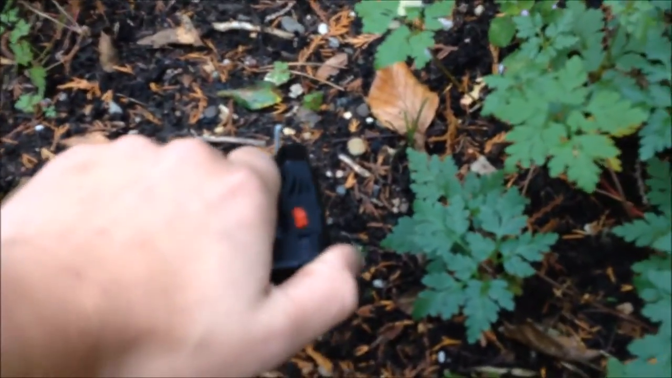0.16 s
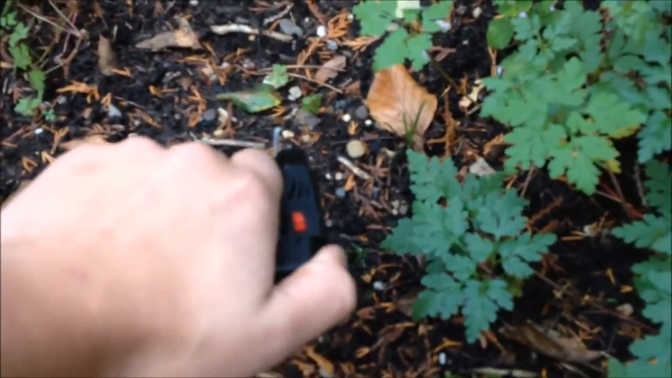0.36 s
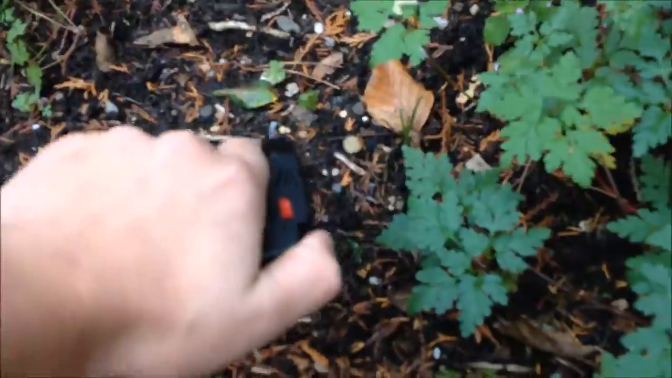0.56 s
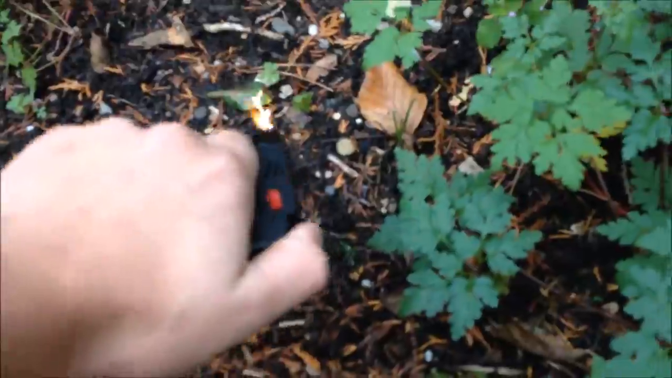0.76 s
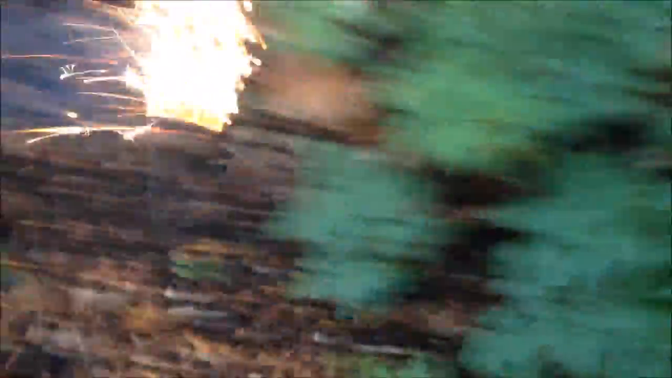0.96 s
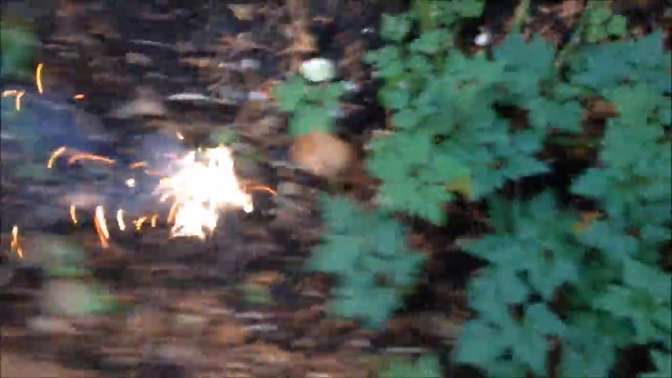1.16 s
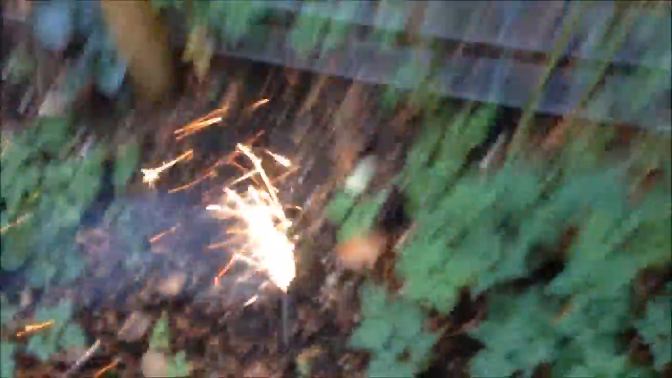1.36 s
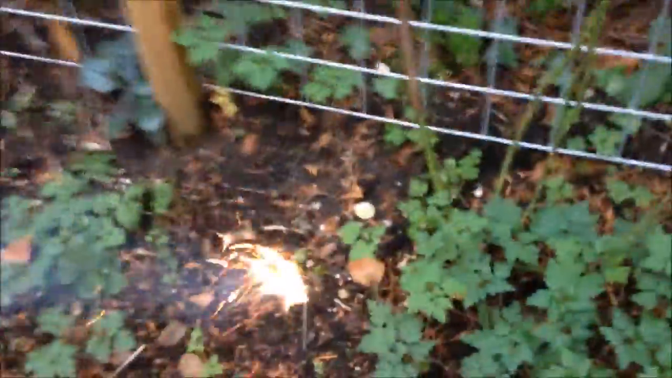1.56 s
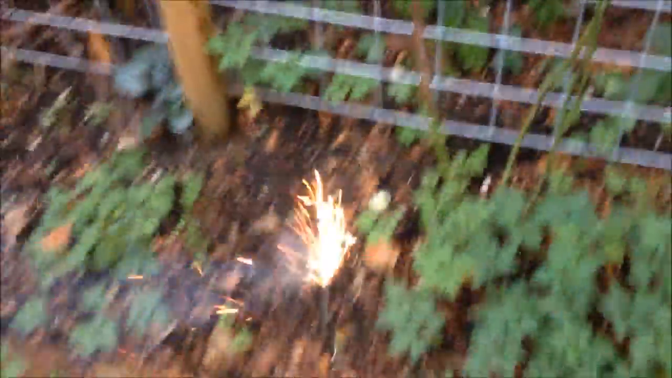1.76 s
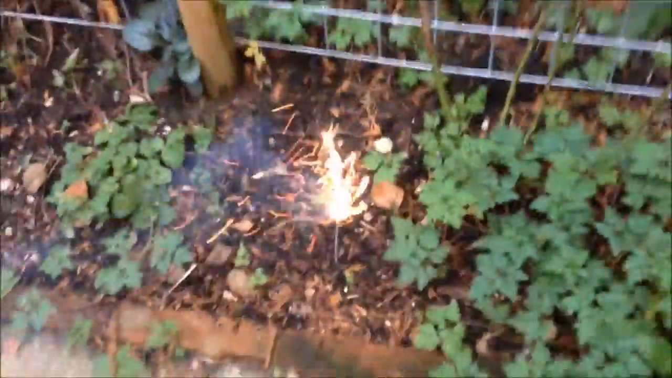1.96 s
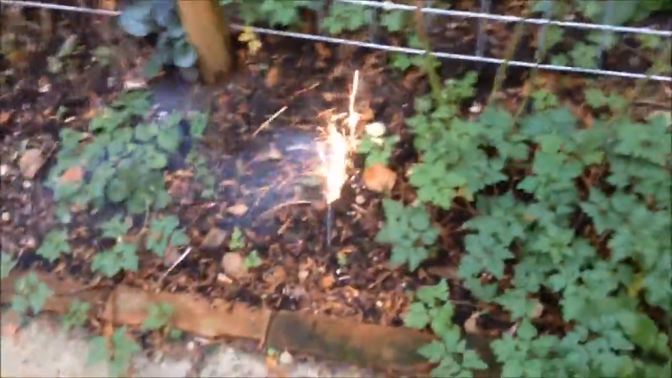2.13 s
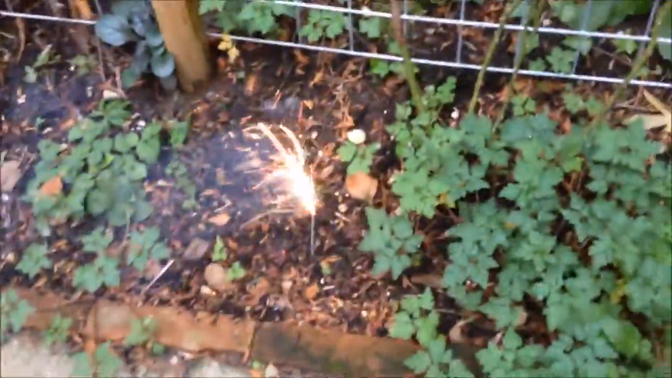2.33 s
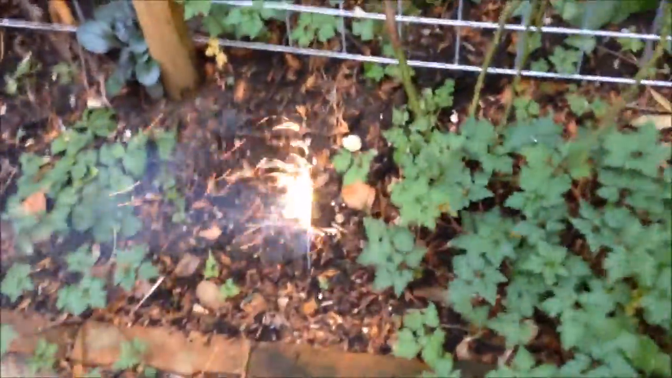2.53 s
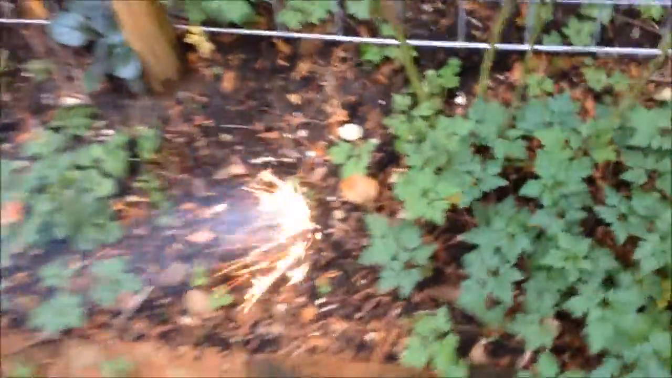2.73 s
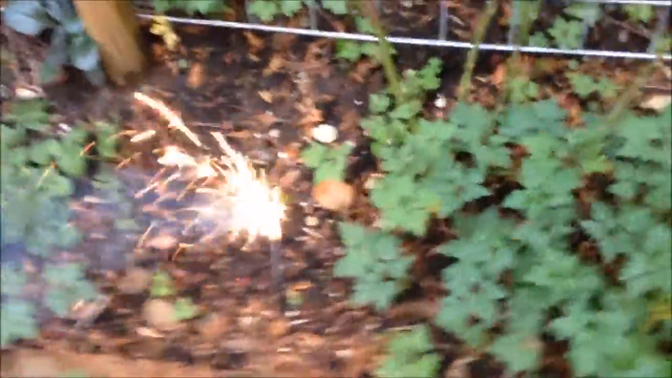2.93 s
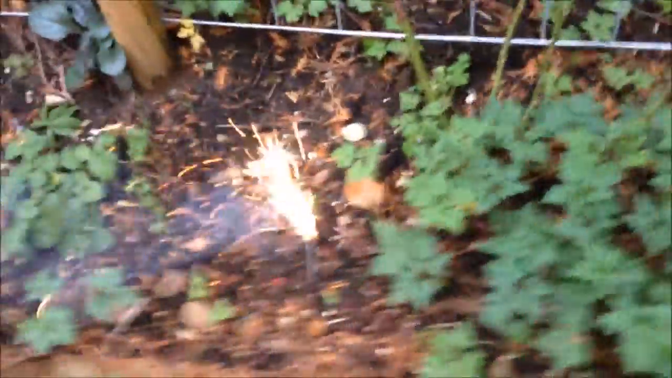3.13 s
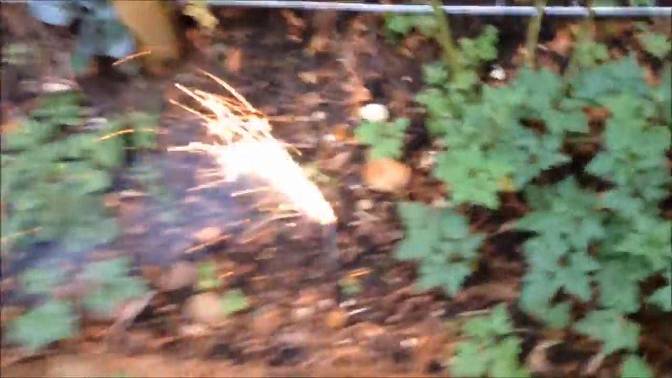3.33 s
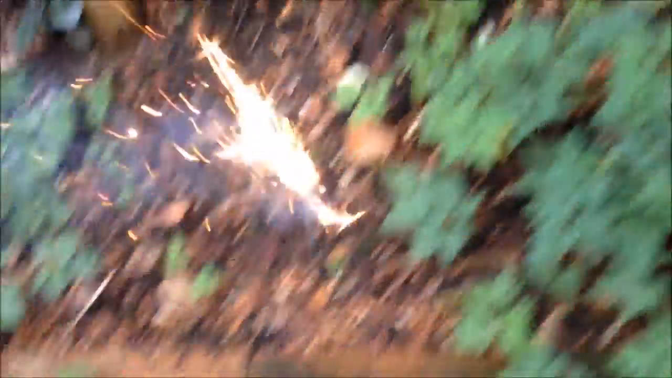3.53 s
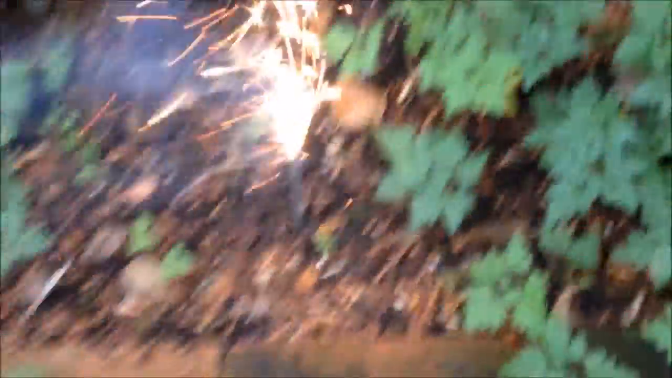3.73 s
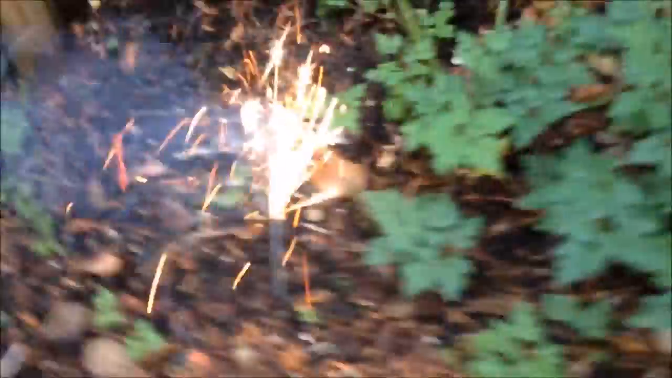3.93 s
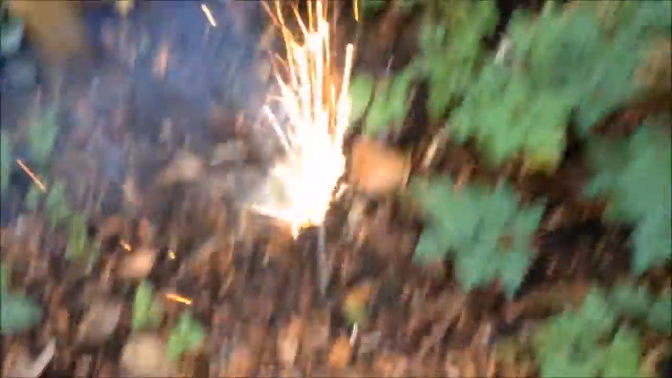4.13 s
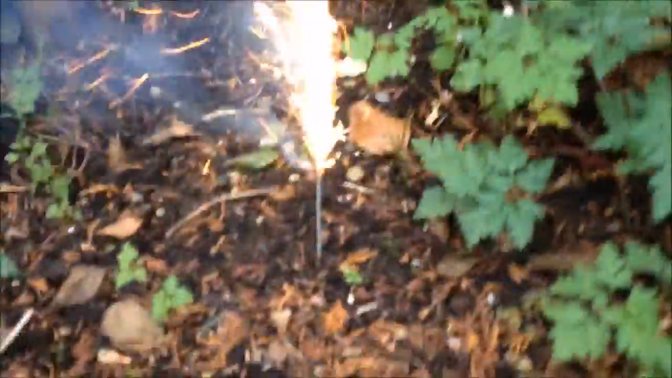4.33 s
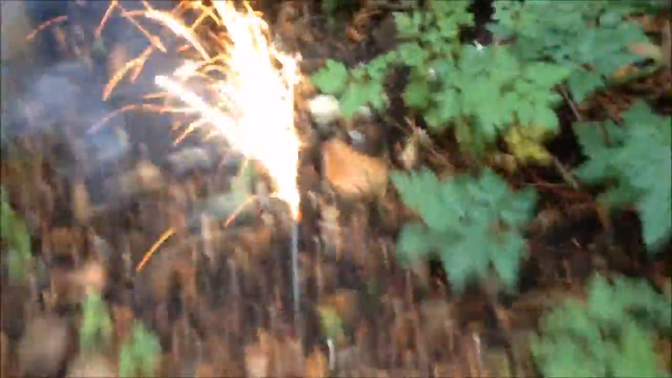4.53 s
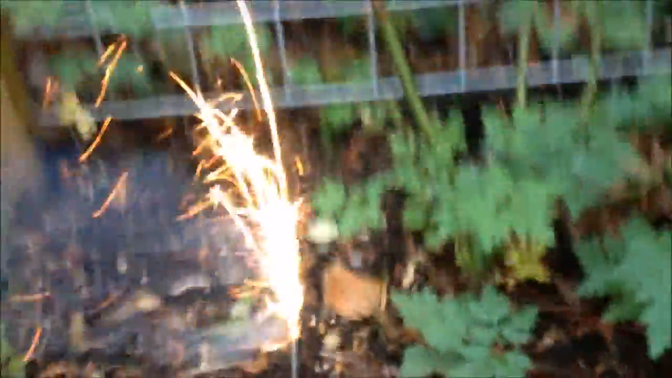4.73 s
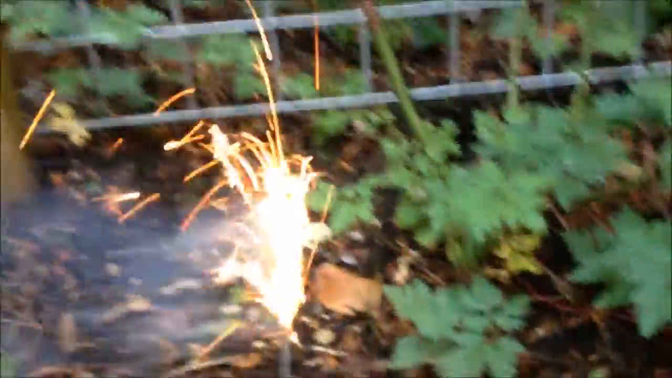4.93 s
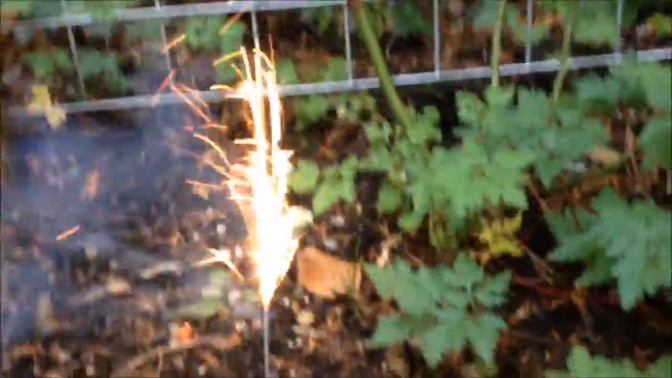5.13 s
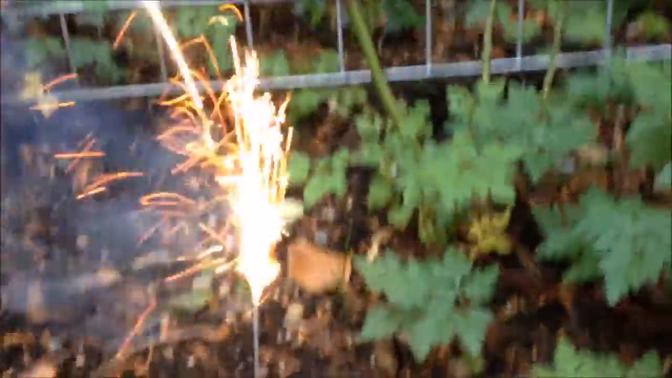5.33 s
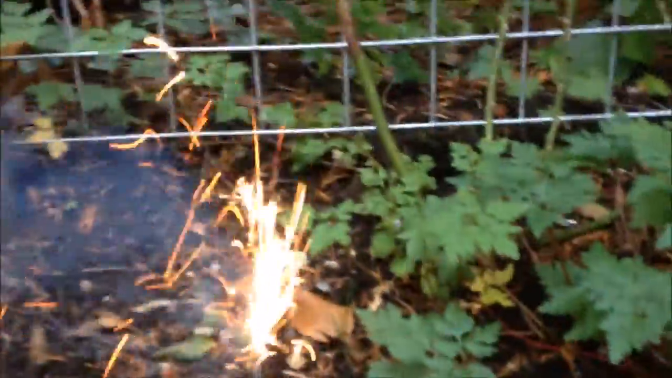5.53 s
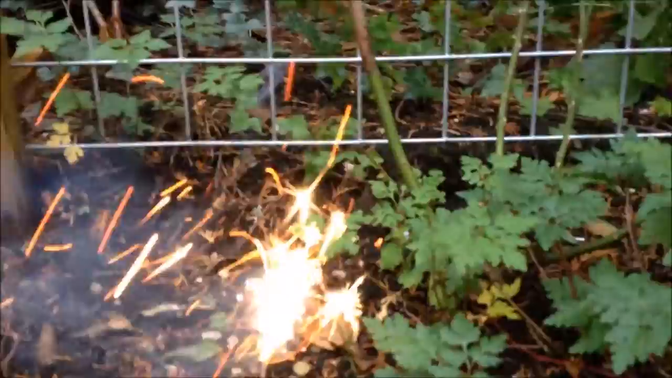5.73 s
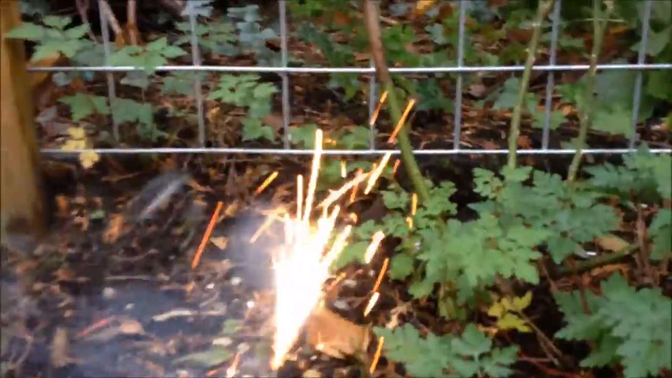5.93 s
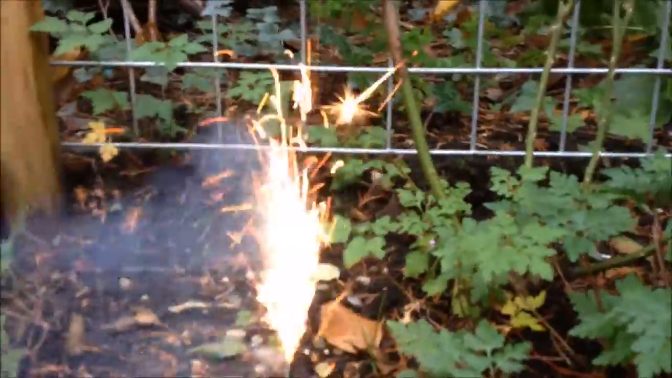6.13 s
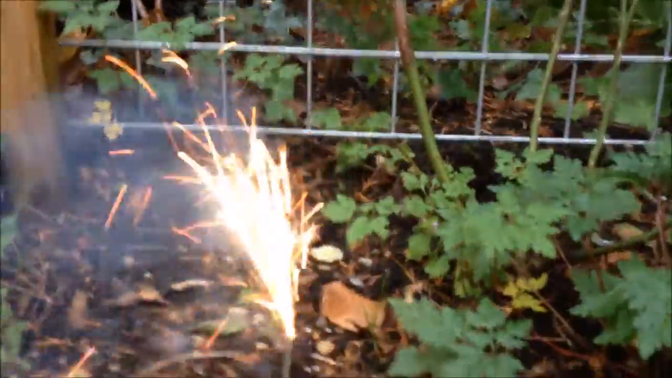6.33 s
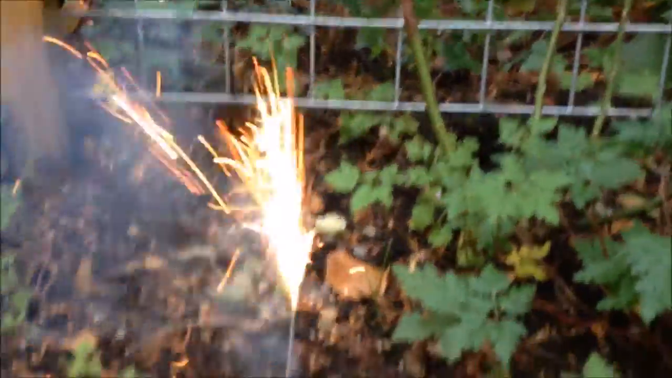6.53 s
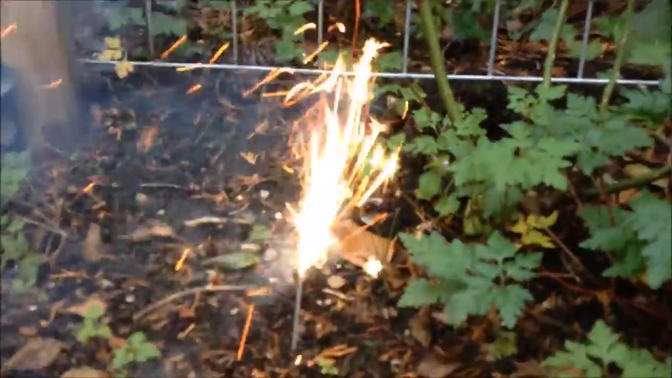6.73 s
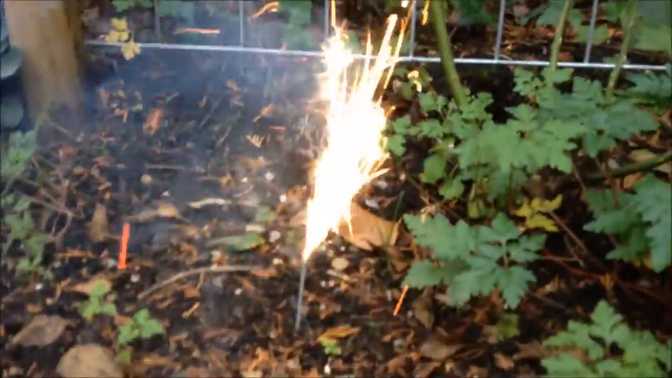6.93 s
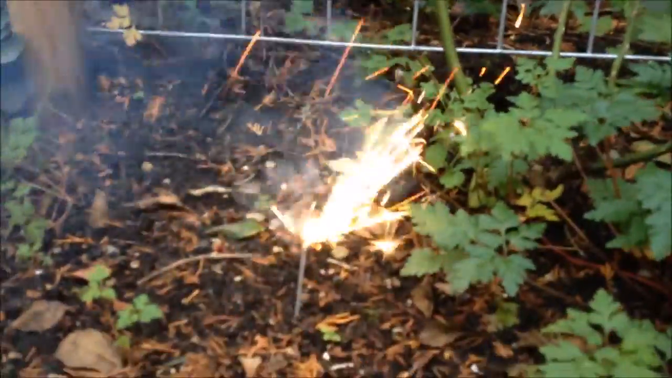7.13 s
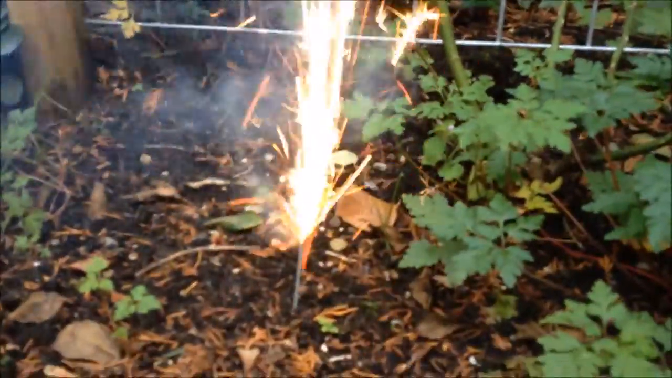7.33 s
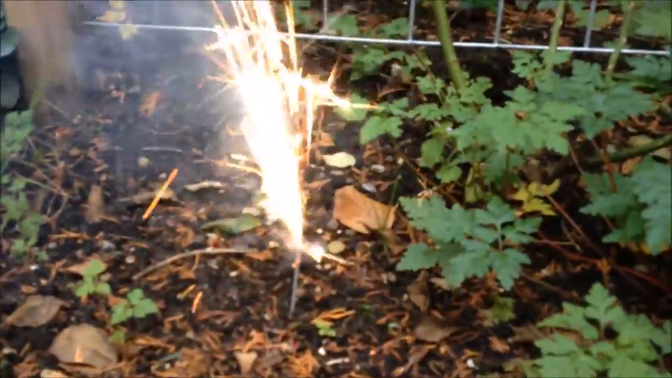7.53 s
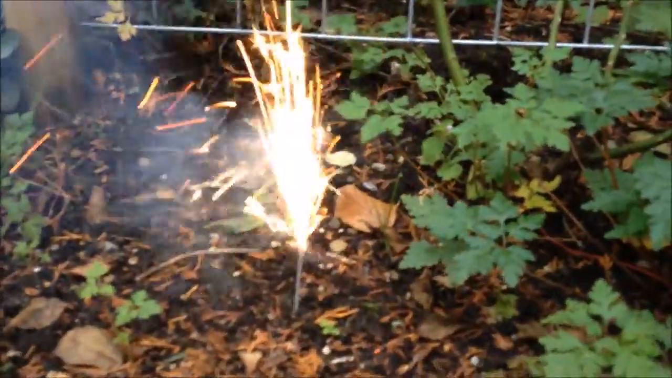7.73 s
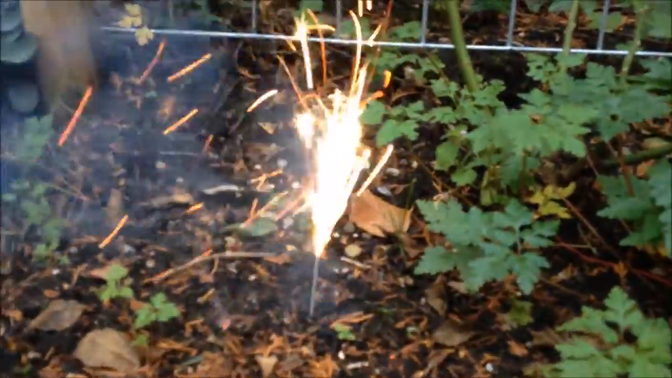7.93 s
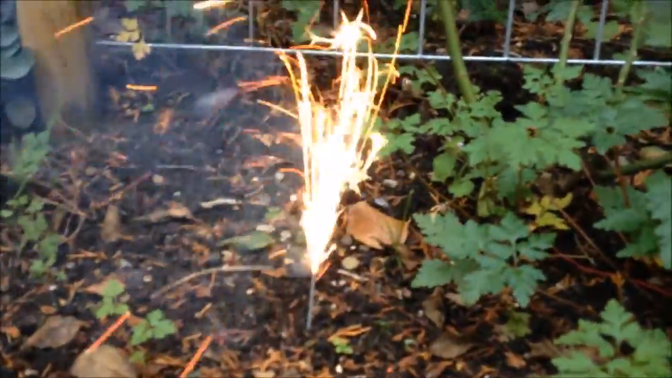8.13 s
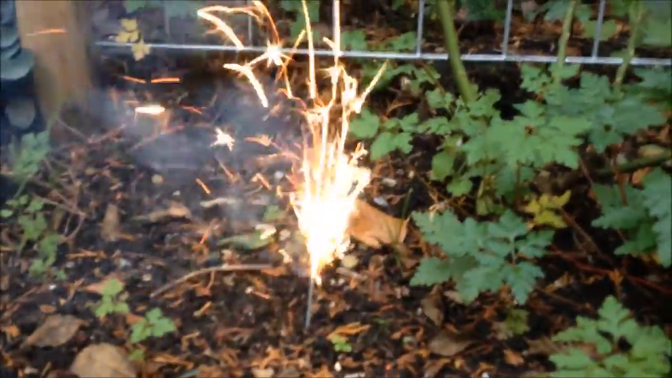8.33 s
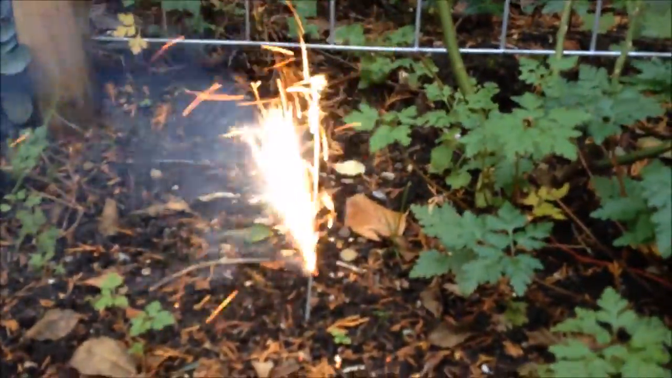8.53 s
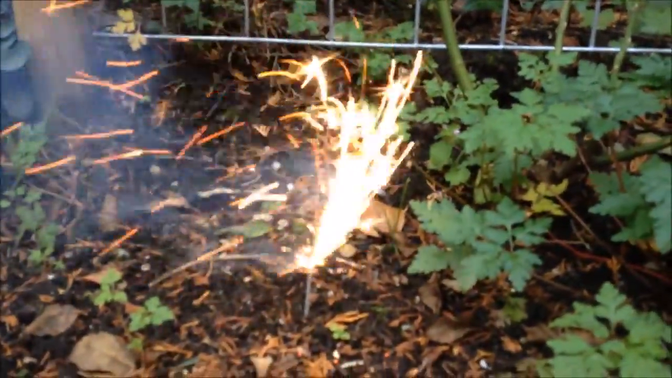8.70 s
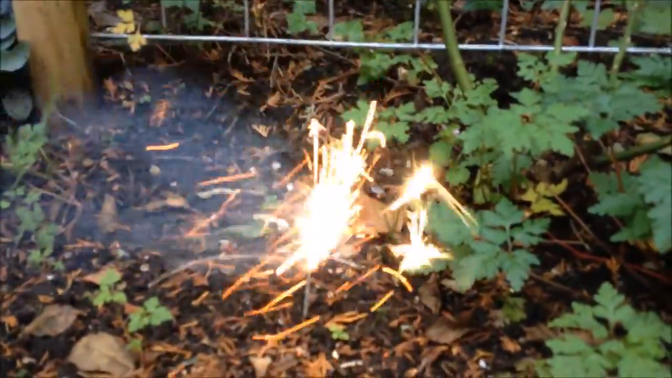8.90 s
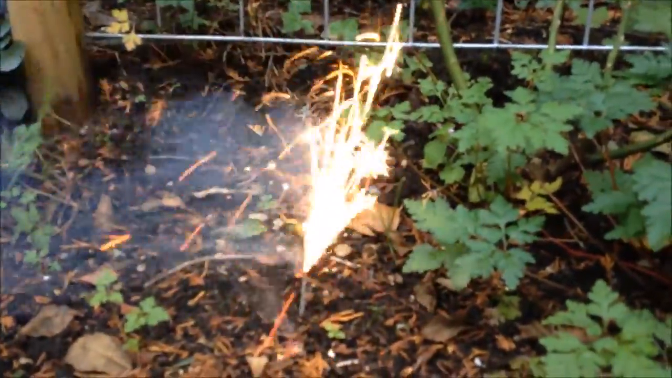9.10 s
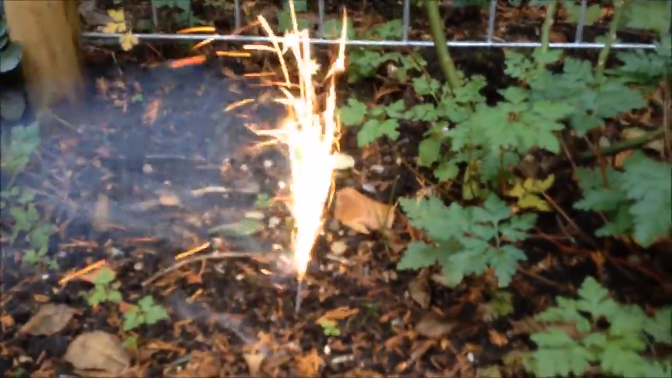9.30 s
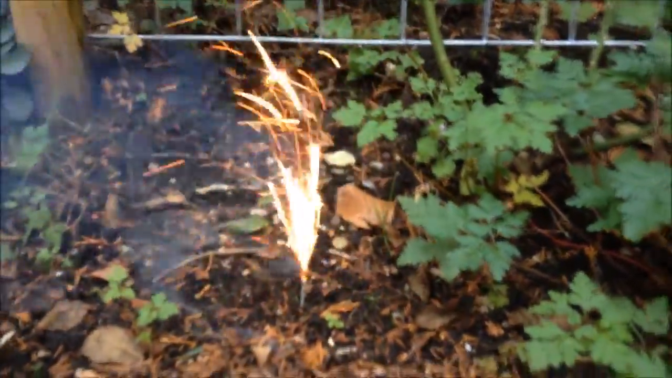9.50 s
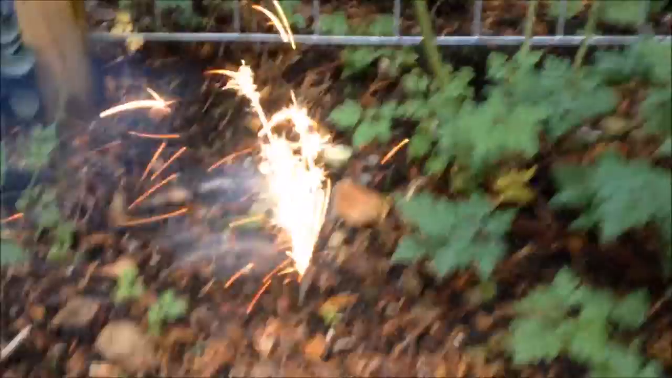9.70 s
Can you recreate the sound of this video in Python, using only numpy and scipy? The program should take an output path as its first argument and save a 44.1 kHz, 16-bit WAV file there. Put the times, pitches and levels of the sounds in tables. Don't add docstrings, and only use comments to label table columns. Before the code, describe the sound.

A quiet garden, with low distant road rumble and a faint nearby machine hum at first. At 0.13 s a plastic lighter ticks lightly, then at 0.28 s its trigger snaps loudly, a brief bright rattle with a short outdoor tail. Soft foot shuffles and a barely audible gas flutter follow. From about 0.8 s a sparkler catches with tiny crackles, rushing up to a strong bright hiss by 1.0 s as the trigger clicks back faintly. Dull, gritty steps retreat from 1.05 to 1.75 s, with softer thumps near 3, 3.8 and 7.4 s. The hiss eases around 2.7 s, then strengthens again, sputtering and flickering with sharp snaps and pops until the end at 9.8 s. Its hollow phasing colour gradually climbs. A faint car swells near 5.75 s and fades. Mono small-camera sound, with occasional momentary watery whistles.

```python
import sys
import numpy as np
from scipy import signal
from scipy.fft import rfft, irfft
from scipy.io import wavfile
from scipy.ndimage import uniform_filter1d, map_coordinates

SR = 44100
rng = np.random.default_rng(int(sys.argv[2]) if len(sys.argv) > 2 else 0)


def rack_gain(trim_db):
    fader = np.asarray(trim_db, float)
    return 10 ** (fader / 20)


def bounce(signal):
    frames = np.transpose(np.atleast_2d(signal))
    limited = np.clip(frames, -1, 1)
    pcm = np.round(limited * 32767).astype(np.int16)
    wavfile.write(sys.argv[1], SR, pcm)


N = 430416
TIME = np.arange(N) / SR
SHORT = TIME[:8192]

# t/s, level/dB
ROAD_LEVEL = [(0, -64), (.42, -59.5), (.62, -64.5), (1.1, -59.5), (2.5, -65.5), (3.3, -67), (3.9, -59.5),
              (4.5, -69), (7.5, -60), (8.2, -61.5), (9.76, -58.5)]
# f/Hz, level/dB
ROAD_TONE = [(12, -71), (20, -42), (32, -37), (54, -21), (136, 4.5), (236, 3.5), (300, -14.5), (390, -39),
             (660, -120)]
# f/Hz, level/dB
GARDEN_TONE = [(150, -15.5), (250, -7.5), (400, -8), (1000, -13.5), (1800, -19), (2500, -23.5), (3750, -22),
               (14600, -35.5), (15400, -28)]
GARDEN_DB = -61
# f/Hz, width/Hz, level/dB, lead/s
EXHAUST = [
    (139, 26, -53, -0.36),
    (238, 26, -56, 0.17),
]
CAR_DB, CAR_PASS_S, CAR_NEAR_S, CAR_FALL = -49, 5.75, 0.38, 1.4
WHINE_DB, WHINE_LEAD_S = -50.5, 0.23
HUM_DB, ROAR_DB = -69.5, -12.5
FAN_HZ, FAN_WIDTH_HZ, FAN_DB, FAN_HIDDEN_S = 173.4, 33, -62, 1.3

# t/s, peak level/dB, tail minus peak/dB, body thud minus peak/dB
LIGHTER_CLICKS = [
    (0.1335, -28.5, -18.5, -18.5),
    (0.279, -11.5, -19, -29),
    (1.0187, -31, -20, -24),
]
# f/Hz, level/dB, time to fall 60 dB/s
CATCH_RINGS = [(1560, -6, .008), (2200, -17, .005), (3140, -10, .005), (3730, -8, .006), (4550, -9, .005),
               (5300, -16, 0.0037), (6780, 0.5, .004), (7600, -1, .003), (8410, 0, .004), (10670, -8, .004),
               (12480, -15, .004), (14000, -19, .004)]
# f/Hz, level/dB, time to fall 60 dB/s
TRIGGER_RINGS = [(1880, -14, .01), (3400, -13, 0.0056), (3900, -19, .005), (4310, -15, .005),
                 (5000, -19, 0.008), (6350, -17, .004), (7140, -1, 0.0037), (8000, -12, .004),
                 (8450, -9, .005), (9440, -11, 0.0044), (11000, -16, .004), (11950, -13, 0.004),
                 (13050, -9, .004), (13840, -13, .004)]
# f/Hz, level/dB, time to fall 60 dB/s
RELEASE_RINGS = [(1750, -8, .01), (2900, -6, 0.0045), (3500, -4, .004), (4230, -8, .004), (5160, -4, .003),
                 (6810, -1, 0.0036), (8070, -9, .003)]
# f/Hz, level/dB
CLICK_TAIL_TONE = [(700, -28), (1800, -3.5), (2600, -8), (4500, -3), (7500, -4.5), (10500, -12),
                   (15400, -16)]
# f/Hz, level/dB
GAS_TONE = [(800, -9.5), (1300, -4), (1800, 2.5), (2100, -9.5), (2500, -18.5)]
GAS_DB = -64.5

# t/s, peak level/dB, f/Hz, time to fall 60 dB/s, grit share
FOOTSTEPS = [(0.197, -54, 194, 0.096, 0.57), (0.281, -43, 378, 0.035, .3), (0.439, -50, 167, 0.064, 0.41),
             (1.062, -55, 80, .12, 0.077), (1.066, -38, 184, 0.079, 0.23), (1.215, -41, 260, 0.045, 0.87),
             (1.24, -51, 75, .1, 0), (1.31, -34, 300, 0.04, 0.46), (1.318, -31.5, 310, 0.046, 0.41),
             (1.334, -43, 1410, 0.045, 0.98), (1.415, -54, 85, .1, 0.081), (1.747, -32, 248, 0.045, 0.14),
             (1.751, -34, 364, 0.05, .1), (2.965, -44, 450, .03, 0), (3.045, -52, 80, 0.092, 0),
             (3.049, -42.5, 190, 0.068, 0), (3.769, -40, 234, 0.058, .1), (7.408, -42, 369, 0.083, 0.4)]
MIC_LOW_HZ = 95

# t/s, hiss level/dB
FLAME_LEVEL = [(0.76, -75), (0.83, -64), (0.86, -51.5), (0.91, -52.5), (0.94, -45), (1.0, -41),
               (1.4, -44.5), (2.0, -46.5), (2.7, -51.5), (3.3, -45.5), (4.2, -44), (4.7, -41.5), (5.4, -44),
               (6.2, -42.5), (7.5, -46.0), (9.0, -44.5), (9.76, -46)]
# t/s, rise/dB
FLARE_UPS = [(1.26, 1), (1.32, 3.5), (2.04, 2), (2.44, 6.5), (2.78, 4), (2.88, 2.5), (2.96, 6.5),
             (3.64, 1.5), (3.82, 1.5), (4.24, 1), (4.49, 2.5), (4.66, 0.5), (4.96, 0), (5.38, 2.5),
             (6.88, 3.5), (7.02, 1.5), (7.24, 1), (7.32, 4), (7.52, 5.5), (7.76, 4.5), (7.88, 3),
             (7.98, 1.5), (8.1, 3), (8.18, 2.5), (8.3, 1.5), (8.7, 3.5), (9.04, 2.5), (9.22, 2),
             (9.54, 2.5)]
# t/s, dip/dB
JET_LULLS = [(1.08, 2.5), (1.16, 5.5), (1.24, 5.5), (1.58, 4), (1.78, 5.5), (1.92, 2), (3.24, 1.5),
             (3.6, 3.5), (4.16, 4), (4.379, 3), (4.92, 3.5), (5.8, 0), (6.12, 1), (6.26, 2.5), (6.34, 2.0),
             (6.54, 3), (6.8, 4.5), (8.44, 2), (9.43, 1.5), (9.65, 3.5)]
FLARE_RISE_S, FLARE_FADE_S, LULL_S = 0.039, 0.054, 0.03
# f/Hz, level/dB
HISS_TONE = [(150, -14.5), (300, -4.5), (1000, -1.76), (1800, -0.8), (2600, -2.5), (3100, -1), (3500, -3),
             (4200, -1), (6000, -1.5), (7200, -2.06), (8500, -2.5), (10500, -6), (13000, -4), (15400, -6)]
TREBLE_STEADY = 0.12
# t/s, peak level/dB, f/Hz
SPARK_POPS = [(0.209, -56, 6000), (0.2175, -52, 2200), (0.228, -54, 11000), (0.248, -55, 3990),
              (0.4375, -47, 1410), (0.463, -48, 1730), (0.5872, -48, 1600), (0.635, -43, 1780),
              (0.641, -45, 1500), (0.716, -48.5, 2500), (0.8057, -49, 1810), (0.8546, -42, 1700),
              (0.875, -41, 2600), (0.8889, -35, 2200), (0.891, -43, 3000), (0.913, -37, 2430),
              (0.947, -39.5, 1600), (0.9605, -37, 1710), (1.0123, -27, 4030), (1.0925, -33, 6990),
              (1.2755, -31, 1850), (1.3138, -28, 2100), (1.3385, -29, 1490), (1.342, -33, 1500),
              (2.025, -35, 3500), (2.7084, -33, 6650), (3.054, -32, 4290), (3.176, -38, 3000),
              (3.39, -40, 3000), (4.9783, -28, 3200), (4.996, -31, 4000), (5.212, -29, 6590),
              (6.3604, -35, 3440), (6.886, -33, 6000), (7.257, -28, 5470), (8.113, -35, 4710),
              (8.4724, -33, 5210), (8.734, -35, 6250), (9.667, -32.5, 1950)]
# t/s, peak
# level/dB
GRAIN_SNAPS = [(0.8544, -34), (0.889, -32), (0.9064, -34), (0.9123, -38), (0.9218, -33), (1.0202, -22),
               (1.1651, -32), (1.7665, -35), (2.6073, -35), (2.7346, -35), (2.8246, -33), (3.6283, -32),
               (3.7614, -31), (3.8501, -28), (3.9554, -29), (4.1057, -34), (4.1758, -30), (4.231, -28),
               (4.2833, -28), (4.313, -31), (4.6741, -29), (4.9324, -32), (5.1691, -28), (5.3008, -32),
               (5.3077, -34), (5.8408, -30), (5.8755, -29), (5.951, -25), (5.9672, -28), (6.1914, -28),
               (6.4921, -33), (6.6412, -25), (6.7783, -32), (6.808, -29), (6.8521, -28), (6.8984, -31),
               (6.9506, -31), (7.009, -31), (7.1271, -27), (7.5083, -27), (7.6261, -28), (7.664, -29),
               (7.8524, -32), (8.0768, -30), (8.1624, -27), (8.3815, -31), (8.685, -26), (8.7112, -32),
               (8.7427, -29), (8.8841, -35), (8.9733, -30), (8.99, -27), (9.0879, -26), (9.1338, -28),
               (9.223, -29), (9.3782, -30), (9.4366, -30), (9.6709, -33), (9.7172, -33), (9.7215, -32)]
SNAP_DB, SNAP_PUSH_S, SNAP_PULL_S = -3, .00003, 0.00013
TICKS_PER_S, TICK_SIZE, TICK_SCATTER_DB, TICK_TOP_DB = 500, 1.7, 2.2, 5
HOLLOW_HZ, HOLLOW_WIDTH_HZ, HOLLOW_SHARE, HOLLOW_FROM_S = 3536, 140, .8, 5.8

# t/s, delay/ms
LITTER_DETOUR = [(.9, .545), (1.4, .575), (1.75, .548), (2.15, .492), (2.6, .49), (3.05, .48), (3.4, .457),
                 (3.8, .408), (4.15, .368), (4.4, .33), (4.7, .312), (4.85, .29), (5.05, .248), (5.6, .23),
                 (5.9, .22), (6.25, .184), (6.6, .168), (7.5, .141), (8.3, .136), (8.9, .129), (9.76, .107)]
# t/s, litter share/0-1, soil share/0-1, extra detour to the soil/ms
BED_VIEW = [(1.3, 0.2, 0, .09), (1.7, 0.28, 0, 0.092), (2.2, 0.24, 0.16, .09), (2.6, 0.23, 0.1, .1),
            (3.1, 0.26, 0.04, 0.11), (3.8, 0.29, 0.12, 0.11), (4.3, 0.17, 0.14, 0.089),
            (4.7, 0.18, 0.13, 0.058), (5.1, 0.13, 0.24, 0.076), (5.5, 0.22, 0.21, .08),
            (6.2, 0.13, 0.25, .072), (6.7, 0.11, .27, .07), (7.8, 0.16, 0.25, 0.064),
            (8.6, 0.26, 0.17, 0.06), (9.2, 0.29, 0.1, 0.055), (9.76, 0.39, 0.1, .055)]
# extra detour/ms, share of the flame's own detour, strength, heard from/s, until/s
STONE_ECHOES = [(.47, .55, .07, 5.9, 9.9), (.89, 0, .05, 7.8, 9.6), (.3, 1, .05, 2.1, 3.3),
                (1.47, 0, .065, 5.9, 9.3), (1.16, 0, .06, 3.6, 5.6), (.3, 1, .04, 1.1, 1.9),
                (.07, 0, .05, 5.0, 6.0), (.15, 1, .03, 5.0, 6.5), (1.09, 0, .09, 9.2, 9.9),
                (1.08, 0, .06, 6.3, 7), (.12, 0, .05, .8, 4), (.265, 0, .03, .8, 3),
                (.36, 0, -.07, 1.9, 3.6), (.3, .9, -.04, 6, 8), (.86, 0, -.08, 3.7, 5.3),
                (1.92, 0, .09, 9.1, 9.9), (1.79, 0, -.08, 9.2, 9.9), (.43, 0, .05, 2.1, 3.3),
                (1.08, 0, -.06, 1.5, 2.8), (.62, 0, .04, 4, 4.7)]
# t/s, delay/ms, strength
FENCE_ECHO = [(.8, 1.45, .03), (1.9, 1.37, .04), (3, 1.41, .07), (3.6, 1.46, .06), (4, 1.57, .09),
              (5, 1.63, .08), (5.7, 1.66, .1), (6.3, 1.64, .07), (6.8, 1.64, 0), (8.8, 1.68, .02),
              (9.4, 1.65, .1), (9.76, 1.65, .11)]
TURN_S = .25
LEAVES, LEAF_SHARE, LEAF_MS, LEAF_RATE = 10, .018, (1.0, 3.5), 1.3
BASS_DB, BASS_DB_PER_MS = 1, -11
CLOSE_DB, AWAY_S = 4.5, 1.3

# f/Hz, sharpness, share
HOUSING_RINGS = [(740, 7, .25)]
TOP_HZ = 15280
# f/Hz, level against the mean tone/dB
ROUNDING_STEP = [(0, -14), (5000, -5), (9000, 1), (15500, 3)]
ODD_FRAMES = {3: 6, 44: 13, 64: 11, 83: 5, 96: 11.5, 102: 11.5, 118: 12.5, 146: 12, 162: 12, 211: 12, 218:
              13, 228: 11, 263: 11.5, 369: 4, 373: 11, 396: 13, 6: -50, 7: -50, 13: -50, 14: -50}


def unit(x):
    return x / np.sqrt(np.mean(x ** 2))


def curves(table):
    s, *columns = np.transpose(table)
    return [np.interp(TIME, s, c) for c in columns]


def colour(x, points):
    hz, db = np.transpose(points)
    f = np.fft.rfftfreq(len(x), 1 / SR) + 1e-3
    gain = rack_gain(np.interp(np.log(f), np.log(hz), db, -120, -120))
    return unit(irfft(rfft(x) * gain, len(x)))


def band(x, order, hz, kind):
    return signal.sosfilt(signal.butter(order, hz, kind, fs=SR, output="sos"), x)


def walk(rate):
    k = int(SR / rate)
    held = np.repeat(rng.standard_normal(N // k + 1), k)
    return unit(uniform_filter1d(held, k)[:N])


def add(out, s, sound):
    i = int(s * SR)
    out[i:i + len(sound)] += sound[:N - i]


def burst(hz, width, t60, rise):
    edges = np.clip([hz / (1 + width), hz * (1 + width)], 30, 16000)
    noise = band(rng.standard_normal(len(SHORT)), 2, edges, "band")
    sound = noise * (1 - np.exp(-SHORT / rise)) * 1000. ** (-SHORT / t60)
    return sound / np.abs(sound).max()


def late(x, ms, order=3):
    return map_coordinates(x, [np.arange(N) - ms * SR / 1000], order=order)


def car(db, pass_s):
    return rack_gain(db) * (1 + ((TIME - pass_s) / CAR_NEAR_S) ** 2) ** (-CAR_FALL / 2)


def hum(hz, width_hz):
    ring = signal.iirpeak(hz, hz / width_hz / 1.5, fs=SR)
    return unit(signal.lfilter(*ring, signal.lfilter(*ring, rng.standard_normal(N))))


def ground_bass_db():
    close = np.clip((AWAY_S - TIME) / 0.42, 0, 1)
    return BASS_DB + BASS_DB_PER_MS * curves(LITTER_DETOUR)[0] + CLOSE_DB * close


def background():
    road_gain = np.hypot(rack_gain(curves(ROAD_LEVEL)[0]), car(CAR_DB, CAR_PASS_S))
    out = road_gain * colour(rng.standard_normal(N), ROAD_TONE)
    upper = unit(band(rng.standard_normal(N), 2, [240, 420], "band"))
    slow_flame_db = uniform_filter1d(curves(FLAME_LEVEL)[0], size=22050)
    roar = rack_gain(slow_flame_db + ground_bass_db() + ROAR_DB)
    whine = car(WHINE_DB, CAR_PASS_S - WHINE_LEAD_S)
    out += rack_gain(-4.0) * np.sqrt(rack_gain(HUM_DB) ** 2 + roar ** 2 + whine ** 2) * upper
    for hz, width, db, lead in EXHAUST:
        out += car(db, CAR_PASS_S - lead) * hum(hz, width)
    fan_heard = np.clip((FAN_HIDDEN_S - TIME) / 0.33, 0, 1)
    out += rack_gain(FAN_DB) * fan_heard * hum(FAN_HZ, FAN_WIDTH_HZ)
    return out + rack_gain(GARDEN_DB + 0.91 * walk(12)) * colour(rng.standard_normal(N), GARDEN_TONE)


def lighter():
    out, thuds, t = np.zeros(N), np.zeros(N), SHORT
    push = np.exp(-((t[:300] - .0012) / 0.00054) ** 2)
    rattle = 2.3 * 1000. ** (-t / 0.019)
    fence = 0.132 * np.exp(-((t - .021) / 0.0014) ** 2)
    fade = (rattle + fence + 0.17 * 1000. ** (-t / 0.26)) * np.clip(t / 0.0007 - 1, 0, 1)
    all_rings = (CATCH_RINGS, TRIGGER_RINGS, RELEASE_RINGS)
    for (s, db, tail_db, thud_db), rings in zip(LIGHTER_CLICKS, all_rings):
        snap = np.zeros(len(t))
        for hz, ring_db, t60 in rings:
            swell = np.convolve(push, 1000. ** (-t / t60))[:len(t)]
            snap += rack_gain(ring_db) * np.sin(2 * np.pi * (hz * t + rng.random())) * swell
        add(thuds, s, rack_gain(db + 10.5 + thud_db) * burst(1050, 0.34, 0.012, 0.00053))
        tail = colour(rng.standard_normal(len(t)), CLICK_TAIL_TONE) * fade
        add(out, s - .0006, rack_gain(db + 8.0) * (snap / np.abs(snap).max() + rack_gain(tail_db) * tail))
    burning = np.interp(TIME, [.28, .3, .85, 1.0], [0, 1, 1, 0])
    out += burning * rack_gain(GAS_DB + 1.5 * walk(30)) * colour(rng.standard_normal(N), GAS_TONE)
    return thuds + band(out, 3, 1400, "high")


def steps():
    out, t = np.zeros(N), SHORT
    for s, db, hz, t60, grit in FOOTSTEPS:
        thump = 1.32 * np.sin(2 * np.pi * hz * t) * (1 - np.exp(-t / 0.003)) * 1000. ** (-t / t60)
        thump += .4 * burst(hz, 0.53, t60, 0.0031)
        crunch = 2.8 * grit * burst(1000, 0.93, t60, 0.0037)
        add(out, s, rack_gain(db - 4.0) * (thump + crunch))
    return band(out, 1, MIC_LOW_HZ, "high")


def burning_db():
    db, = curves(FLAME_LEVEL)
    age = TIME[:22050]
    flare = np.minimum(age / FLARE_RISE_S, 1) * np.exp(-np.maximum(age - FLARE_RISE_S, 0) / FLARE_FADE_S)
    for s, rise_db in FLARE_UPS:
        add(db, s, rise_db * flare)
    lull = np.exp(-((TIME[:8820] - .1) / LULL_S) ** 2)
    for s, dip_db in JET_LULLS:
        add(db, s - .1, -dip_db * lull)
    return db


def sparkler():
    hiss_db = burning_db()
    lit = np.clip((TIME - .76) / 0.066, 0, 1)
    grains = rng.standard_normal(N) * rack_gain(2.0 * rng.standard_normal(N))
    ticks = rng.random(N) < TICKS_PER_S / SR
    tick_db = np.minimum(TICK_SCATTER_DB * rng.exponential(size=N), TICK_TOP_DB)
    grains += ticks * TICK_SIZE * rack_gain(tick_db)
    flicker = rack_gain(0.77 * walk(25) + 0.99 * walk(90) + 0.86 * walk(400))
    hiss = colour(grains, HISS_TONE) * flicker
    top = signal.sosfiltfilt(signal.butter(2, 9500, "high", fs=SR, output="sos"), hiss)
    hiss += top * (rack_gain(TREBLE_STEADY * (uniform_filter1d(hiss_db, size=17640) - hiss_db)) - 1)
    out = lit * rack_gain(hiss_db + 1.05) * unit(hiss)
    for s, db, hz in SPARK_POPS:
        crack = np.sin(2 * np.pi * hz * SHORT) * np.exp(-SHORT * hz / 0.6)
        add(out, s, rack_gain(db) * (1.1 * crack + 0.49 * burst(hz, 0.95, 0.0092, 0.00027)))
    t = TIME[:64] - .0001
    pull = (t > 2 * SNAP_PUSH_S) * np.exp(-t / SNAP_PULL_S)
    snap = np.exp(-(t / SNAP_PUSH_S) ** 2) - 0.34 * pull
    for s, db in GRAIN_SNAPS:
        add(out, s - .0001, rack_gain(db + SNAP_DB) * snap)
    out = band(out, 2, MIC_LOW_HZ, "high")
    hollow = signal.lfilter(*signal.iirpeak(HOLLOW_HZ, HOLLOW_HZ / HOLLOW_WIDTH_HZ, fs=SR), out)
    return out + HOLLOW_SHARE * np.clip(TIME / HOLLOW_FROM_S, .3, 1) * hollow


def over_soil(x):
    litter_ms, = curves(LITTER_DETOUR)
    litter, soil, depth_ms = curves(BED_VIEW)
    low = signal.sosfiltfilt(signal.butter(1, 1200, fs=SR, output="sos"), x)
    x = x + (rack_gain(ground_bass_db()) - 1) * low
    dull = signal.lfilter([.9], [1, -.3], x)
    mirrors = litter * late(dull, litter_ms + .006 * walk(6))
    mirrors += soil * late(dull, litter_ms + depth_ms)
    for extra_ms, share, strength, s, until in STONE_ECHOES:
        heard = np.clip(np.minimum(TIME - s, until - TIME) / TURN_S + .5, 0, 1)
        mirrors += strength * heard * late(dull, extra_ms + share * litter_ms, order=1)
    for ms in rng.uniform(*LEAF_MS, size=LEAVES):
        mirrors += LEAF_SHARE * walk(LEAF_RATE) * np.roll(dull, int(ms * SR / 1000))
    fence_ms, fence = curves(FENCE_ECHO)
    mirrors += fence * late(dull, fence_ms, order=1)
    return (x + mirrors) / np.sqrt(1 + litter ** 2 + soil ** 2)


def camera_rounding(x):
    hop, lead = 941, 200
    n, k = np.arange(2 * hop), np.arange(hop)
    window = np.sin(np.pi * (n[:, None] + .5) / (2 * hop))
    tones = np.cos(np.pi / hop * np.outer(n + .5 + hop / 2, k + .5))
    basis = window * tones * np.sqrt(2 / hop)
    padded = np.pad(x, (hop + lead, 3 * hop))
    frames = n + hop * np.arange(len(padded) // hop - 1)[:, None]
    lines = padded[frames] @ basis
    usual = rack_gain(np.interp(k * SR / (2 * hop), *np.transpose(ROUNDING_STEP)))
    step = usual * np.sqrt(uniform_filter1d(lines ** 2, size=201)) + 1e-9
    for frame, db in ODD_FRAMES.items():
        step[frame] = rack_gain(db) * np.sqrt(np.mean(lines[frame, 20:640] ** 2))
    rounded = np.sign(lines) * np.floor(np.abs(lines) / step + .4) * step
    out = np.zeros(len(padded))
    np.add.at(out, frames, rounded @ basis.T)
    return out[hop + lead:][:N]


def scene():
    mono = background() + lighter() + steps() + over_soil(sparkler())
    return np.tile(mono, (2, 1))


def band_limit(x):
    return signal.sosfilt(signal.butter(12, 16640, fs=SR, output="sos"), x)


def record(dry):
    heard = dry[0].copy()
    for hz, sharpness, share in HOUSING_RINGS:
        heard += share * signal.lfilter(*signal.iirpeak(hz, sharpness, fs=SR), dry[0])
    cut = signal.sosfilt(signal.ellip(10, .2, 40, TOP_HZ, fs=SR, output="sos"), heard)
    mix = np.tile(camera_rounding(cut), (2, 1))
    return band_limit(mix)


dry = scene()
out = record(dry)
bounce(out)
```